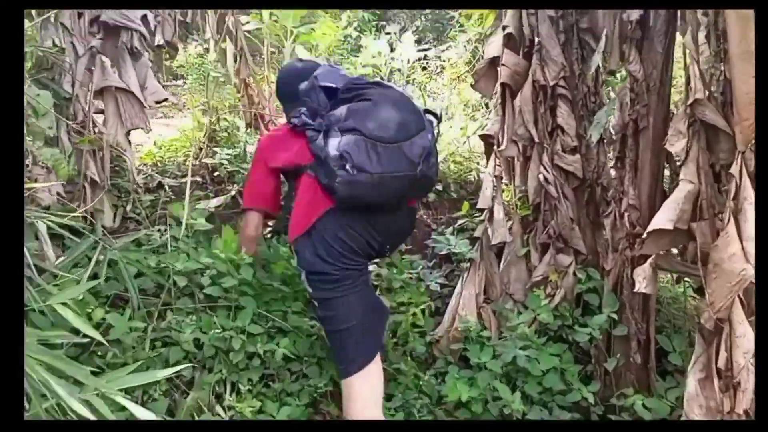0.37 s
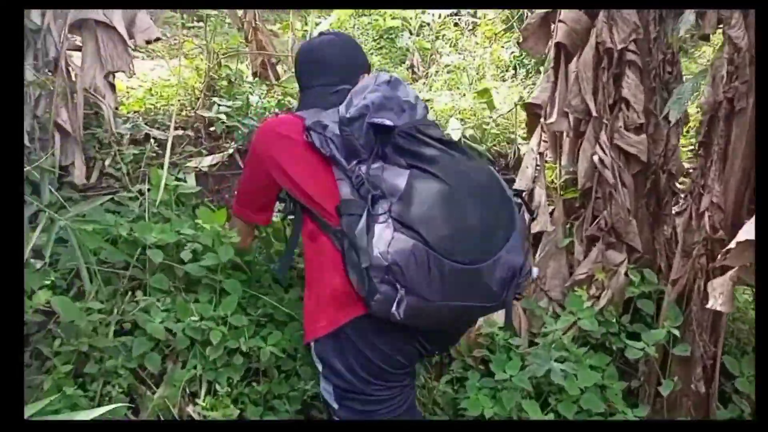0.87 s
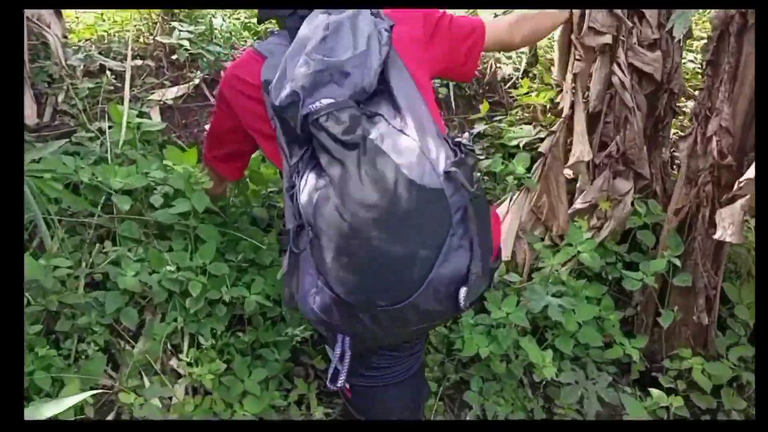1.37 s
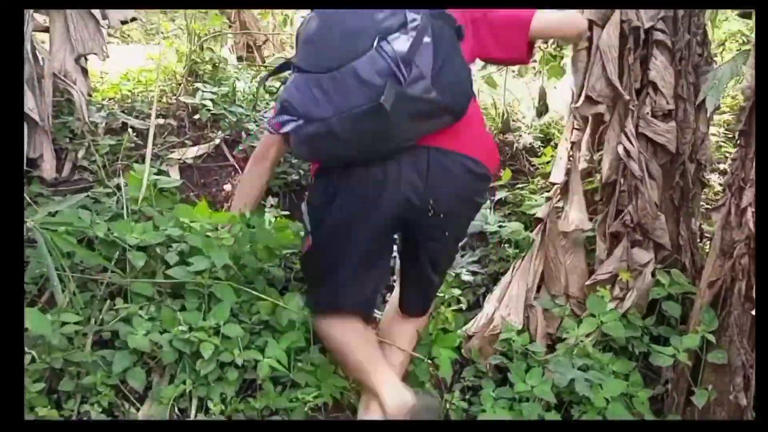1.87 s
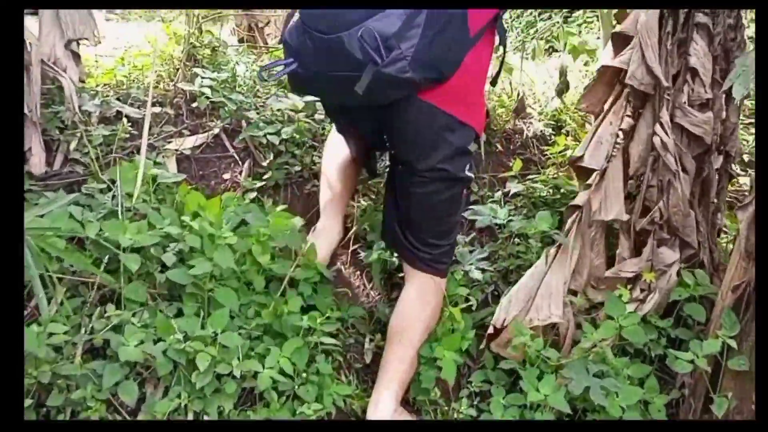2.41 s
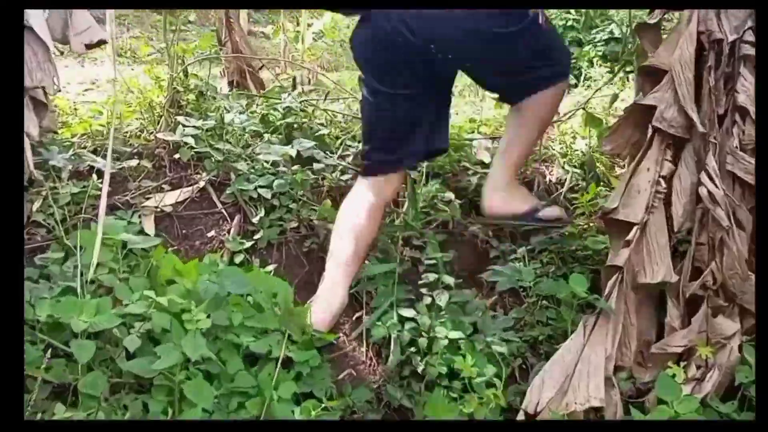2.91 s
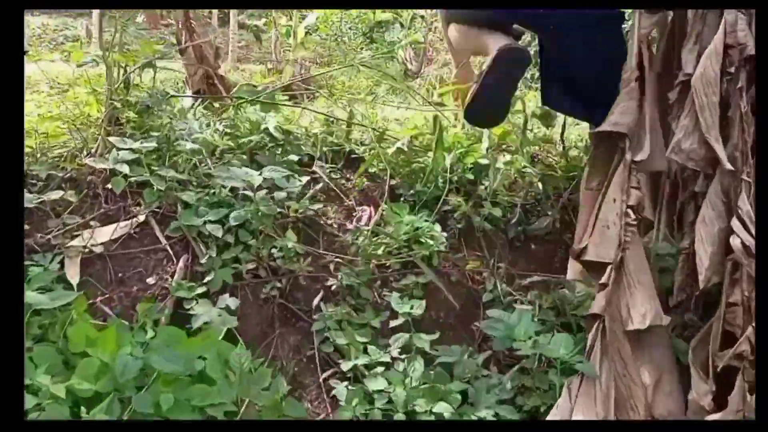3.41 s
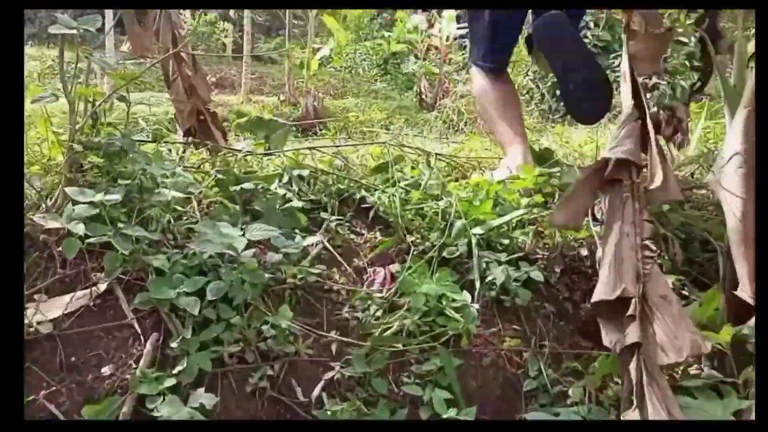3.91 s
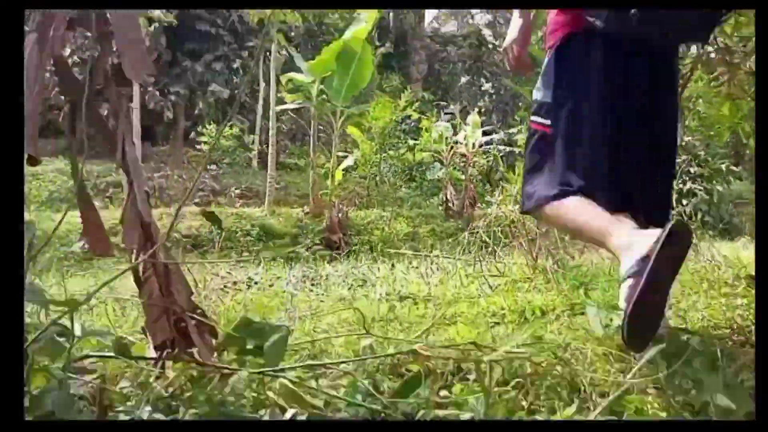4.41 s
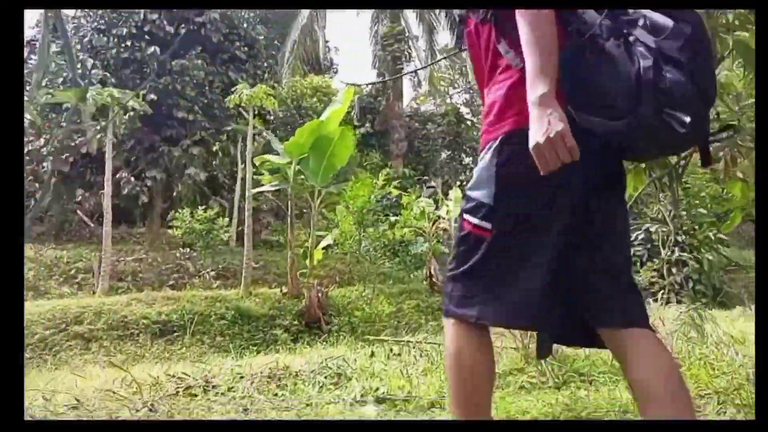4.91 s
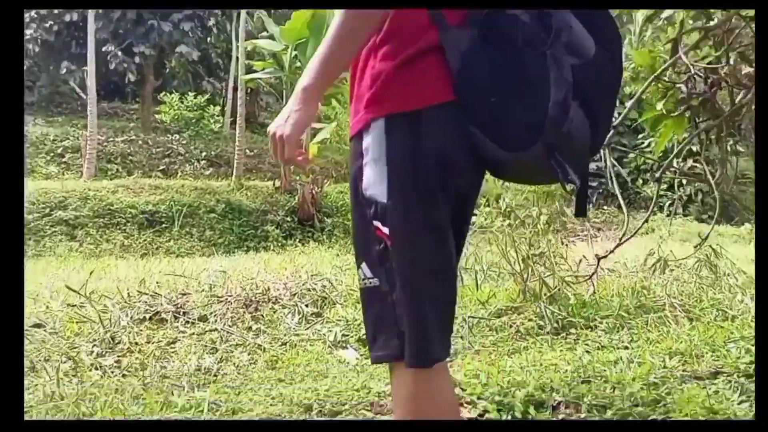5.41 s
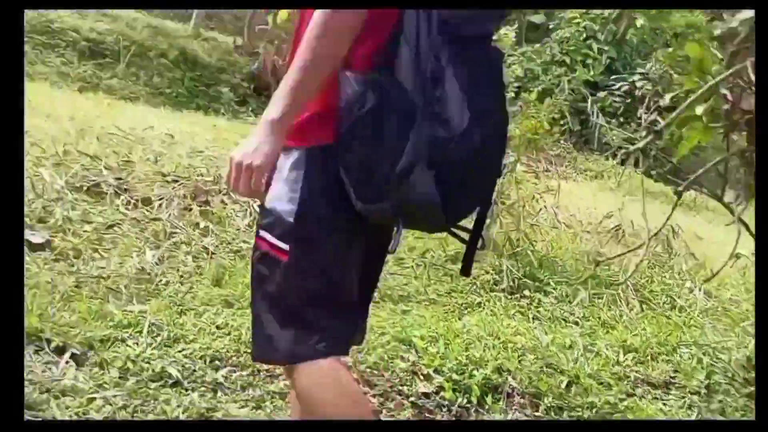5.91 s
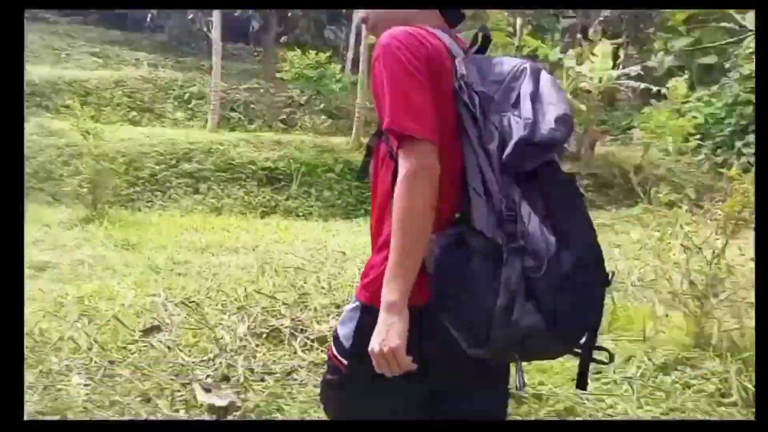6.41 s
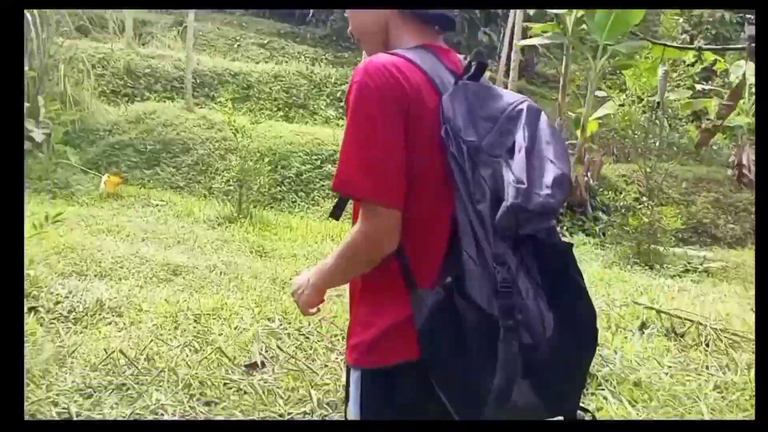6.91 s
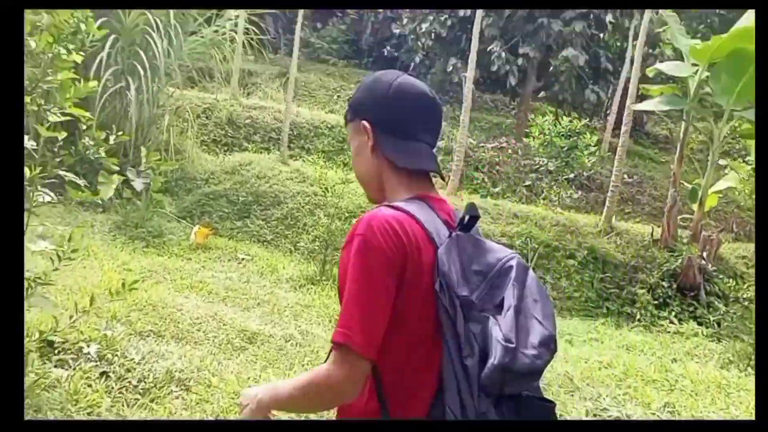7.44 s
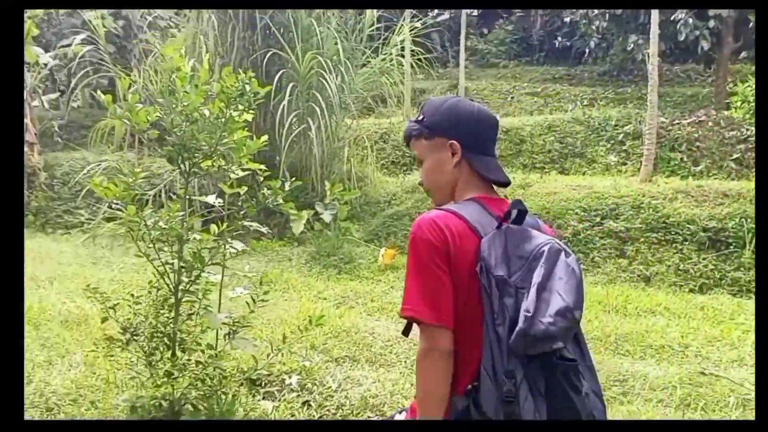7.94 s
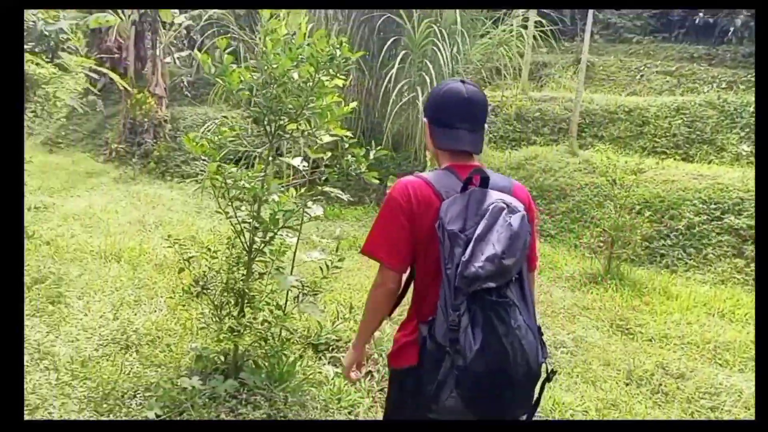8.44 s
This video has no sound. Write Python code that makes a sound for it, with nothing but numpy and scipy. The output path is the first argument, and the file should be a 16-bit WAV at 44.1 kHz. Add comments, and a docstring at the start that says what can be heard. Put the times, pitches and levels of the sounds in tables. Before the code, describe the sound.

Dry foliage crackles and snaps outdoors, falling quiet midway with a faint distant engine, before a rough close burst of leaves and microphone bumps.

```python
"""Two walkers in the undergrowth

Two walkers climb a bank through green undergrowth and dry hanging leaves. Arched swells of crackling
noise make the rustle and a faint high hiss; dying bursts and rings make snapping leaves, twigs and edges.
Lumpy low noise and short low pulses are air and bumps on a hand-held microphone, and narrow-band noise
is the singing of rubbed leaves. A gliding sine is one bird chirp, and firing-rate harmonics a far engine."""
import sys
import numpy as np
from scipy import signal
from scipy.fft import rfft, irfft, next_fast_len
from scipy.io import wavfile
from scipy.ndimage import uniform_filter1d, map_coordinates

SR = 44100
rng = np.random.default_rng(int(sys.argv[2]) if len(sys.argv) > 2 else 0)


def transcribe(signal):
    """Save signal, clipped to [-1, 1], as a 16-bit WAV file at the path in sys.argv[1]."""
    frames = np.atleast_2d(signal).T
    limited = np.clip(frames, -1, 1)
    pcm = np.round(limited * 32767).astype(np.int16)
    wavfile.write(sys.argv[1], SR, pcm)


def decibels_to_gain(level_db):
    """Convert a level in decibels to a linear amplitude gain (20 dB per decade)."""
    exponent = np.asarray(level_db, float) / 20
    return 10 ** exponent


N = 377407

# single snaps of leaves and twigs: (time [s], nominal level [dB], ringing pitch [Hz], tick relative level [dB])
SNAP_EVENTS = [(0.263, -30.5, 3020, -18), (0.314, -27, 1850, -22), (0.6034, -34.5, 2800, -23),
               (.8598, -37, 2450, -14), (1.1793, -44, 5220, -5), (1.2922, -38, 3600, -27),
               (1.3897, -28.5, 3430, -15), (1.463, -26, 1200, -30), (1.743, -42.5, 1180, -6),
               (1.78, -40, 1280, -4), (1.91, -27, 1250, -13), (2.0571, -25, 1660, -9),
               (2.1765, -18, 1134, -17), (2.3732, -22.5, 2490, -19), (2.638, -31, 2040, -7.5),
               (2.718, -40, 1310, -16), (2.7543, -19, 717, -30), (2.841, -42, 1370, -10),
               (3.1087, -34.5, 5500, -2), (3.149, -18.5, 1820, -11), (3.192, -25, 2400, -16),
               (3.2648, -32, 2960, -31), (3.7615, -19.5, 4080, -8), (3.8986, -12.5, 6120, -1),
               (3.9957, -22.5, 2270, -28), (4.2712, -38.5, 2170, -25), (4.3038, -36, 910, -15),
               (4.4247, -44, 1470, -9.5), (4.6507, -33.5, 584, -20), (4.758, -39, 4470, -10),
               (4.806, -44.5, 1670, -30), (4.891, -49, 4540, 8), (4.976, -46, 1430, -9),
               (5.0262, -30, 1900, -20), (5.1687, -37, 2490, -20), (5.3822, -45, 3570, -16),
               (5.493, -47, 4900, 0), (5.605, -44, 2950, -9), (5.826, -42, 4120, -17),
               (6.1253, -29, 1707, -20), (6.161, -39.5, 1800, -19), (6.1967, -45, 1000, -14),
               (6.291, -26.5, 3306, -23), (6.341, -20, 2090, -30), (6.415, -29, 5930, -6.5),
               (6.4685, -33, 3230, -12), (6.5173, -21, 3680, -10), (6.578, -25.5, 3300, -22),
               (6.6626, -15, 4870, -11), (6.7784, -24, 2750, -3.5), (6.8217, -15, 984, -19),
               (6.8522, -17, 2260, -19), (6.9038, -18, 1020, -6), (7.1203, -18.5, 6030, -8),
               (7.168, -10.5, 7370, -11), (7.215, -23, 3560, -5), (7.2542, -17, 1410, -11),
               (7.2805, -11.5, 924, -13), (7.2981, -11, 875, -13), (7.3177, -19, 3370, -3.5),
               (7.368, -10.5, 6840, -10.5), (7.4443, -21.5, 2700, -15), (7.6924, -21, 5240, -22),
               (7.707, -22, 5200, -23), (7.782, -28, 6900, -8), (8.0358, -33.5, 1030, -16),
               (8.117, -35, 2000, -13), (8.357, -27, 4040, -20), (8.4072, -34, 2200, -17),
               (8.458, -34, 2240, -21)]
# colour of the plant sounds at the microphone: (frequency [Hz], gain [dB])
PLANT_COLOUR = [(180, -30.5), (300, 6), (545, -6), (900, -6), (1310, -3.5), (2390, -3), (4200, -3.5),
                (6040, -4), (7200, -7.5), (8100, -14), (9300, -7.5), (10600, 1.5), (11600, -3.5),
                (12500, -13), (13600, -22.5), (15000, -3.5), (15400, -8)]
STROKE_RISE, STROKE_FALL = 0.6, 0.97  # arch exponents: a stroke sets in fast and eases out


def unit(x):
    """Normalisation to a root-mean-square value of 1."""
    return x / np.sqrt(np.mean(x ** 2) + 1e-20)


def curves(rows):
    """Linear interpolation: one value per sample for each column after the time."""
    times, *columns = np.transpose(rows)
    t = np.arange(N) / SR
    return [np.interp(t, times, column) for column in columns]


def wobble(rate):
    """Slow random modulation: a smooth spline through random knots, rate knots a second."""
    knots = rng.standard_normal(int(N * rate / SR) + 4)
    return map_coordinates(knots, [np.arange(N) * rate / SR])


def coloured(x, points, lo_hz=1, hi_hz=20000, order=4):
    """Minimum-phase filtering: the log gain, folded to a causal cepstrum, fixes the phase."""
    m = next_fast_len(N // 2 + 4096) * 2
    hz = np.fft.rfftfreq(m, 1 / SR) + 1
    f, db = np.transpose(points)
    low_edge = 1 + (lo_hz / hz) ** (2 * order)
    high_edge = 1 + (hz / hi_hz) ** (2 * order)
    gain = decibels_to_gain(np.interp(np.log(hz), np.log(f), db)) / np.sqrt(low_edge * high_edge)
    cepstrum = irfft(np.log(gain + 1e-6), m)
    cepstrum[1:m // 2] *= 2
    cepstrum[m // 2 + 1:] = 0
    response = np.exp(rfft(cepstrum))
    return irfft(rfft(x, m) * response, m)[..., :N]


def patchy(x, patchy_db, size):
    """Time-frequency modulation: narrow bands of noise swell for a moment and fade."""
    z = signal.stft(x, nperseg=512, noverlap=384)[2]
    random_gain = rng.standard_normal(z.shape)
    across_bands = uniform_filter1d(random_gain, size[0], 0)
    patches = unit(uniform_filter1d(across_bands, size[1], 1))
    swell = np.logaddexp(0, 2 * patches)  # swells stand out more than dips
    return signal.istft(z * decibels_to_gain(patchy_db * swell), nperseg=512, noverlap=384)[1][:N]


def crackle(rate, spread_db, life, hiss):
    """Shot noise: random leaf breaks, mostly small, each a short dying burst, over a sliding hiss."""
    strength_db = spread_db * rng.exponential(1, N).clip(0, 3.2)
    breaks = (rng.random(N) < rate / SR) * decibels_to_gain(2 * strength_db)  # in power
    power = signal.lfilter([1], [1, -np.exp(-1 / (life * SR))], breaks)
    return unit(rng.standard_normal(N) * np.sqrt(power / power.mean() + hiss ** 2))


def swells(rows, rise, fall, rest_db):
    """Incoherent addition: arches, one a row, add in power; one dB curve for each level column."""
    start, length, db, *relative = np.transpose(rows)
    power = np.full((1 + len(relative), N), decibels_to_gain(2 * np.reshape(rest_db, (-1, 1))))
    top = (rise / (rise + fall)) ** rise * (fall / (rise + fall)) ** fall  # maximum of the arch
    row_levels = np.transpose([db, *(db + r for r in relative)])
    for s, span, levels in zip(start, length, row_levels):
        at = np.arange(max(round(s * SR), 0), min(round((s + span) * SR), N))
        u = np.clip((at / SR - s) / span, 0, 1)
        arch = u ** rise * (1 - u) ** fall / top
        power[:, at] += (decibels_to_gain(levels)[:, None] * arch) ** 2
    return 10 * np.log10(power)


def released(levels, hold=0.011, jump=0.0024):
    """Stick and release: leaves hold still until a snap frees them, so a rise through it becomes a step."""
    out = np.array(levels)
    for s, *_ in SNAP_EVENTS:
        a, b, c = (round(x * SR) for x in (s - hold, s, s + jump))
        out[:, a:b] = np.minimum(out[:, a:b], out[:, a:a + 1])
        out[:, b:c] = np.maximum(out[:, b:c], out[:, c:c + 1])
    return out


def field():
    """Stationary broadband noise: the quiet, even hiss of the open field."""
    # colour of the hiss: (frequency [Hz], gain [dB])
    field_colour = [(24, -19), (40, -35), (114, -7), (255, 6.5), (912, -2), (1580, -18), (6110, -9),
                    (8240, -21), (10100, 1.5), (10900, 0.5), (11700, -1), (13300, -9), (15000, -10),
                    (15400, -8)]
    hiss = patchy(rng.standard_normal(N), patchy_db=0.7, size=(4, 14))
    level_db = -67 + 0.44 * wobble(4.1)
    return decibels_to_gain(level_db) * unit(coloured(hiss, field_colour))


def rustle():
    """Frictional crackle: arched swells of blades, crisp high noise and heavy stems, partly in common."""
    # rustling strokes through the plants, and long faint swells of high background hiss: (start [s],
    # length [s], thin dry blades level [dB], broad blades relative level [dB], crisp highs relative level [dB])
    strokes = [(-0.042, 0.11, -64.5, -5.5, 6.5), (0.178, 0.26, -68, 7, 5), (0.221, 0.632, -54, 0.0, 0.5),
               (0.249, 0.14, -49.5, 2.0, 1), (0.324, 0.114, -56.5, -16, 13.5), (0.361, 0.096, -46, -4.5, 4),
               (0.589, 0.16, -53, 4.5, -0.5), (0.785, 0.48, -67, -3.0, 8.5), (0.824, 0.087, -63.5, 9, 3),
               (1.285, 0.1, -52, -3, -0.5), (1.302, 0.32, -51.5, 0.5, -3), (1.371, 0.13, -46.5, 1.5, -1.5),
               (1.539, 0.12, -65.5, -2, 4), (1.7, 0.168, -66.5, 0, 4), (1.744, 0.941, -53.5, 2.5, -0.5),
               (1.87, 0.3, -59, 4, -3), (1.907, 0.05, -51, 5.5, -8), (1.937, 0.096, -43, -9, 4),
               (2.0, 0.268, -44.5, -1.5, -2), (2.146, 0.055, -57.5, 15, -12.0),
               (2.347, 0.089, -44, -1.5, -5), (2.349, 0.98, -65, 1.5, 9.5), (2.405, 0.2, -53, 0, -4),
               (2.744, 0.041, -66, 17.5, -0.5), (2.829, 0.15, -62, 2, 4), (3.098, 0.54, -53, 0.5, -0.5),
               (3.1, 0.039, -58, -2, 9), (3.124, 0.095, -52, -1.5, 0), (3.137, 0.027, -36.5, -8, 2),
               (3.185, 0.038, -44, -1, -7), (3.252, 0.085, -47.5, 0.5, -5.0), (3.325, 0.11, -62.5, 5.5, 10),
               (3.379, 0.68, -46.5, -5.5, -1.0), (3.6, 0.059, -45, -11, -8),
               (3.619, 0.217, -39.5, -3.0, 2.0), (3.752, 0.13, -41.5, -5, -1.0),
               (3.848, 0.039, -45, 3.5, -12.5), (3.867, 0.76, -65, -1, 10), (3.885, 0.085, -41, -7.5, -3),
               (3.891, 0.021, -30.5, -2.5, 3), (3.986, 0.056, -63, 16.5, 1.5), (4.076, 0.086, -61, -1.5, 6),
               (4.261, 0.15, -59, 3.0, 5), (4.431, 0.78, -71, -1, 12), (4.565, 0.07, -69.0, -3, 16.5),
               (4.621, 0.075, -59.5, -1, 3), (4.883, 0.035, -61.5, 0, 8), (4.911, 0.7, -74.5, 0, 12),
               (5.01, 0.059, -60.5, 7, 7), (5.154, 0.065, -65, -4, 10), (5.465, 0.1, -73.5, -2.5, 13),
               (5.539, 0.1, -62, -5, 5.5), (5.591, 0.058, -62, -5, 4), (5.741, 0.71, -70.5, -1, 10.5),
               (6.112, 0.075, -78, 14, -9.0), (6.189, 0.076, -62, -5, -15.5),
               (6.28, 0.16, -55, -2.5, -11.5), (6.284, 0.042, -42, -2.5, -12.0),
               (6.338, 0.061, -38, 2.5, -10), (6.4, 0.044, -50.5, -7, -0.5), (6.423, 1, -45, -8, -5),
               (6.509, 0.07, -45.0, -2, 4.5), (6.513, 0.062, -50, -3, 0), (6.563, 0.053, -45.5, -2, -13.5),
               (6.65, 0.21, -39, -13, -10), (6.666, 0.078, -41, -7.0, 3.5),
               (6.777, 0.32, -44.5, 7.5, -10.5), (6.818, 0.032, -33, -5, -5), (6.825, 0.7, -40, -7, 1.5),
               (6.963, 0.084, -35.5, 1.5, -3), (7.11, 0.063, -35.0, -3.0, -1),
               (7.156, 0.049, -41, -17.5, 2.0), (7.232, 0.062, -34.5, -6.5, -11), (7.25, 0.25, -51, 3.5, 5),
               (7.273, 0.19, -35, -4.5, 0.5), (7.409, 0.64, -56, -2, 4.5), (7.423, 0.066, -34.5, -4, -2.5),
               (7.681, 0.085, -38, -11, -10), (7.744, 0.091, -53.5, -2, 1), (7.924, 0.8, -57.5, 0.5, 7),
               (8.107, 0.036, -65.0, 14, -12.5), (8.184, 0.16, -52.5, -17, 5.5),
               (8.29, 0.13, -44, -11.5, -2.5), (8.388, 0.11, -52.5, -0.5, 1.5)]
    # heavy stems bending and dragging: (start [s], length [s], level [dB])
    stem_strokes = [(0.222, 0.75, -69.5), (0.292, 0.33, -58), (0.871, 0.092, -69), (1.07, 0.072, -65.5),
                    (1.262, 0.58, -69.5), (1.358, 0.2, -56), (1.782, 0.066, -60), (1.829, 0.87, -56.5),
                    (1.92, 0.15, -46), (2.05, 0.101, -48), (2.12, 0.12, -40), (2.487, 0.12, -75),
                    (2.629, 0.392, -63), (2.741, 0.065, -54), (2.799, 0.559, -69), (3.076, 0.73, -59),
                    (3.115, 0.079, -47), (3.211, 0.87, -62), (3.543, 0.49, -55.5), (3.661, 0.22, -47.5),
                    (3.864, 0.813, -71.5), (3.985, 0.059, -51), (4.289, 0.1, -58.5), (4.518, 0.935, -74.5),
                    (4.641, 0.047, -61), (5.012, 0.059, -58), (6.178, 0.081, -62), (6.273, 0.505, -55.5),
                    (6.33, 0.06, -42), (6.511, 0.11, -50.5), (6.673, 0.097, -47), (6.752, 0.8, -42.5),
                    (6.806, 0.08, -38), (6.865, 0.12, -50), (6.901, 0.13, -39.5), (6.99, 0.059, -33),
                    (7.228, 0.21, -38), (7.265, 0.037, -33), (7.441, 0.039, -38.5), (7.463, 0.6, -63.5),
                    (7.708, 0.068, -59.5), (7.856, 0.78, -62), (8.099, 0.1, -69), (8.372, 0.16, -53)]
    shape = STROKE_RISE, STROKE_FALL, -76  # level at rest [dB]
    arches = [*swells(strokes, *shape), *swells(stem_strokes, *shape)]
    thin_db, broad_db, crisp_db, heavy_db = released(arches)

    shared = crackle(rate=250, spread_db=2.0, life=0.0011, hiss=1.0)
    shared = shared + 0.5 * crackle(rate=98, spread_db=4.0, life=0.0002, hiss=0.056)
    blade_breaks = 0.99 * crackle(rate=500, spread_db=3.0, life=0.0023, hiss=1.0)
    crisp_breaks = 0.62 * crackle(rate=120, spread_db=3.5, life=0.0039, hiss=1.0)
    stem_breaks = 0.75 * crackle(rate=81, spread_db=11.0, life=0.0052, hiss=1.7)
    blades = patchy(shared + blade_breaks, patchy_db=3.0, size=(2, 16))
    crisp = patchy(shared + crisp_breaks, patchy_db=1.74, size=(8, 8))
    stems = patchy(shared + stem_breaks, patchy_db=3.5, size=(2, 28))

    clumps = 0.68 * wobble(30)  # leaves give way in bunches [dB]
    # (source, level [dB], low edge [Hz], high edge [Hz])
    layers = [(blades, broad_db + clumps, 1300, 3500),
              (blades, thin_db + clumps, 3500, 8000),
              (crisp, crisp_db + 0.43 * clumps, 8200, 20000),
              (stems, heavy_db + 0.37 * clumps, 480, 1300)]
    return sum(decibels_to_gain(db) * unit(coloured(x, PLANT_COLOUR, lo, hi, order=5)) for x, db, lo, hi in layers)


def air():
    """Turbulent pressure: lumpy low noise, and bumps that push the capsule for a few cycles."""
    # gusts over the microphone: (start [s], length [s], deep buffet level [dB], flutter relative level [dB])
    gusts = [(-0.012, 0.14, -64.5, -7), (0.335, 0.422, -61, -10), (0.737, 0.302, -73, 2),
             (2.164, 0.08, -82, 12), (2.434, 0.099, -69, -8), (3.143, 0.055, -72, 16),
             (3.637, 0.19, -68, 6), (3.704, 0.058, -50, -2), (3.947, 0.094, -74, -7),
             (4.085, 0.72, -62.5, -24), (4.285, 0.054, -53, -23), (4.549, 0.09, -56, -10),
             (5.103, 0.239, -69.5, 0), (5.414, 0.141, -82, 16.5), (5.803, 0.65, -62.5, -19),
             (6.007, 0.065, -58, -5), (6.084, 0.061, -47, -13), (6.115, 0.076, -60, 0.5),
             (6.321, 0.17, -70.5, 13), (6.507, 0.077, -73.5, 16), (6.704, 0.25, -71.5, 15.5),
             (6.866, 0.69, -56, 10), (7.072, 0.046, -39.5, -2), (7.129, 0.88, -66.5, -7),
             (7.284, 0.047, -44.5, 12), (7.294, 0.057, -51, 13), (7.676, 0.049, -58, -14),
             (7.873, 0.063, -64, -1), (8.104, 0.057, -69, 5), (8.385, 0.31, -79, 12)]
    # bumps on the microphone: (time [s], level [dB], frequency [Hz])
    bumps = [(3.714, -37.5, 110), (6.023, -38, 98), (6.088, -41, 82), (7.038, -30, 118), (7.105, -43, 86.1),
             (7.118, -24.5, 153), (7.178, -40, 96.9), (7.296, -16.5, 240), (7.303, -18.5, 205),
             (7.319, -44, 128), (8.128, -53, 114)]
    # colour of the air noise: (frequency [Hz], gain [dB])
    rumble_colour = [(15, -21), (25, -24), (56, -4.5), (86, 1), (138, -4), (249, -5), (300, -3.5),
                     (390, -67.5), (660, -120)]
    deep_db, flutter_db = swells(gusts, rise=0.74, fall=0.8, rest_db=[-83.5, -74.5])
    lumps = decibels_to_gain(2.5 * wobble(18))
    deep = unit(lumps * coloured(rng.standard_normal(N), rumble_colour, 1, 110))
    flutter = unit(lumps * coloured(rng.standard_normal(N), rumble_colour, 110, 400))

    pushes = np.zeros(N + SR)
    t = np.arange(SR // 8) / SR
    for s, db, hz in bumps:
        u = t * hz / 0.4  # the envelope is highest after 0.4 cycle
        pulse = u * np.exp(1 - u) * np.sin(2 * np.pi * hz * t)
        pushes[round(s * SR):][:len(t)] += decibels_to_gain(db) * pulse
    thumps = coloured(pushes[:N], [(60, 0), (400, 0)], 94, order=2)
    return decibels_to_gain(deep_db) * deep + decibels_to_gain(flutter_db) * flutter + thumps


def bird():
    """Frequency modulation and scattering: an arched whistle that the trees repeat in a diffuse tail."""
    # chirp: (time [s], pitch [Hz], level [dB])
    chirp_path = [(.12, 6200, -80), (.127, 7100, -67), (.137, 7300, -50.5), (.146, 7250, -65),
                  (.152, 6550, -55), (.16, 6360, -90)]
    hz, db = curves(chirp_path)
    during_call = np.abs(np.arange(N) / SR - 0.14) < 0.02
    call = decibels_to_gain(db) * np.sin(2 * np.pi * np.cumsum(hz) / SR) * during_call
    t = np.arange(SR // 8) / SR
    trees = rng.standard_normal(len(t)) * decibels_to_gain(-60 * t / 0.17)  # 60 dB decay in 0.17 s
    return call + decibels_to_gain(-1) * signal.fftconvolve(call, trees / np.linalg.norm(trees))[:N]


def snaps():
    """Impulsive fracture: a broad crack, a short ring of the leaf or twig, and a crisp tick."""
    t60, crack_octaves = 0.028, 0.73  # crack decay by 60 dB [s]; its spread on each side of the ring
    t = np.arange(SR // 8) / SR
    crack, tick, ring = np.zeros((3, N + SR))
    for s, db, hz, tick_db in SNAP_EVENTS:
        at = slice(round(s * SR), round(s * SR) + len(t))
        crack_noise, tick_noise, phase_noise = rng.standard_normal((3, len(t)))
        around = signal.butter(1, hz * 2 ** (crack_octaves * np.array([-1, 1])), 'band', fs=SR)
        crack[at] += decibels_to_gain(db - 10 - 60 * t / t60) * unit(signal.lfilter(*around, crack_noise))
        tick[at] += decibels_to_gain(db + tick_db + 5 - 60 * t / (1.13 * t60)) * tick_noise
        rough = 1.4 * np.cumsum(phase_noise) * np.sqrt(hz / SR / 12)  # the ring is unsteady in phase
        ring[at] += decibels_to_gain(db - 6 - 60 * t / (1.2 * t60)) * np.sin(2 * np.pi * hz * t + rough)
    cracks = coloured(crack[:N], PLANT_COLOUR, 500, 8000)
    ticks = coloured(tick[:N], PLANT_COLOUR, 8200)
    rings = coloured(ring[:N], PLANT_COLOUR, 500)
    return cracks + ticks + rings


def rubs():
    """Narrow-band friction noise: a leaf rubbed along its length sings, under the arch of a stroke."""
    # rubs: (start [s], length [s], level [dB], pitch [Hz])
    rub_rows = [(.33, 0.21, -60, 750), (0.701, 0.093, -64, 903), (.84, 0.069, -62, 1600),
                (0.868, 0.083, -59.5, 606), (1.504, .12, -57, 1200), (1.733, 0.52, -59.5, 1220),
                (1.79, 0.088, -61.5, 594), (1.922, 0.31, -58, 679), (2.15, .08, -59, 330),
                (2.369, .22, -56.5, 693), (2.459, 0.15, -56, 1206), (2.478, 0.11, -52.5, 1904),
                (2.804, 0.12, -59.5, 1350), (3.09, 0.14, -55.5, 480), (3.189, .035, -43, 2436),
                (3.26, 0.024, -36.5, 2910), (3.295, 0.15, -58.5, 804), (3.411, .08, -57.5, 351),
                (7.683, 0.067, -37.5, 5530), (7.7, .1, -52.5, 1900), (8.02, 0.045, -57, 1045),
                (8.104, 0.083, -54, 577), (8.399, 0.031, -46.5, 2160), (8.431, 0.086, -58, 420)]
    half_width = 0.076  # half the bandwidth over the pitch
    out = np.zeros(N + SR)
    for s, span, db, hz in rub_rows:
        t = np.arange(round(span * SR)) / SR
        a, b = rng.standard_normal((2, SR))
        lowpass = signal.butter(2, half_width * hz, fs=SR)
        slow = signal.lfilter(*lowpass, a + 1j * b)[-len(t):]
        band = np.real(slow * np.exp(2j * np.pi * hz * t))  # shifted up to the pitch
        arch = (t / span) ** STROKE_RISE * (1 - t / span) ** STROKE_FALL
        out[round(s * SR):][:len(t)] += decibels_to_gain(db) * unit(band) * arch / arch.max()
    return out[:N]


def clicks():
    """Brittle fracture: leaf edges break right at the microphone in brief bursts about an octave wide."""
    # clicks: (time [s], level [dB], centre frequency [Hz])
    click_rows = [(3.6732, -21, 10100), (3.761, -19, 10200), (6.9284, -16, 3450), (6.9846, -20, 4660),
                  (7.0444, -16, 10800), (7.0645, -20, 10900), (7.1057, -19, 3330), (7.1777, -16, 11200),
                  (7.2138, -18, 3890), (7.2265, -14, 4270), (7.2804, -14, 10700), (7.325, -13, 11100),
                  (7.3824, -25, 4540), (7.4044, -18, 10700), (7.4128, -16, 10800)]
    t60 = 0.0062  # decay by 60 dB [s]
    out = np.zeros(N + SR)
    t = np.arange(SR // 40) / SR
    for s, db, hz in click_rows:
        octave = signal.butter(1, hz * np.array([0.6, 1.5]), 'band', fs=SR)
        burst = unit(signal.lfilter(*octave, rng.standard_normal(len(t))))
        out[round(s * SR):][:len(t)] += decibels_to_gain(db - 60 * t / t60) * burst
    return coloured(out[:N], PLANT_COLOUR)


def engine():
    """Harmonic series: only a few low orders of the firing rate reach over the trees, each wavering."""
    # far engine swelling up: (start [s], length [s], level [dB])
    revs = [(4.92, 0.086, -71), (5.06, 0.076, -56.5), (5.12, 0.35, -53), (5.47, 0.16, -71),
            (5.75, .55, -75.5)]
    # firing orders that carry: (multiple of the firing rate [1], relative level [dB])
    orders = [(2, -34), (3, -24), (5, -24), (6, -6.5), (7, 4), (8, -7)]
    db, = swells(revs, rise=0.94, fall=0.45, rest_db=-120)
    t = np.arange(N) / SR
    blip = np.exp(-((t - 3.8) / 0.026) ** 2)  # a brief rate rise, inaudible; the rate is steady in the swells
    firing_hz = 44.2 + 3.6 * blip
    turn = 2 * np.pi * np.cumsum(firing_hz) / SR
    tones = np.zeros(N)
    for k, level in orders:
        tones += decibels_to_gain(level + 3 * wobble(14)) * np.sin(k * turn + 0.5 * wobble(12))
    return decibels_to_gain(db) * tones


def scene():
    """Linear superposition: all sources add at one microphone."""
    plants = rustle() + snaps() + rubs() + clicks()
    return (field() + plants + air() + bird() + engine())[None]


def top_cut(x):
    """Nothing passes above the cut-off."""
    return signal.sosfilt(signal.butter(12, 16820, fs=SR, output="sos"), x)


def record(dry):
    """Band limitation: the recorder keeps nothing from 15470 Hz upward."""
    passed = np.fft.rfftfreq(N, 1 / SR) < 15470
    kept = irfft(rfft(dry) * passed, N)
    return top_cut(kept)


dry = scene()
out = record(dry)
transcribe(out)
```